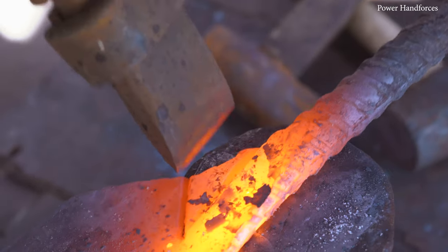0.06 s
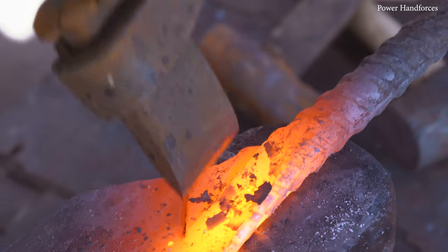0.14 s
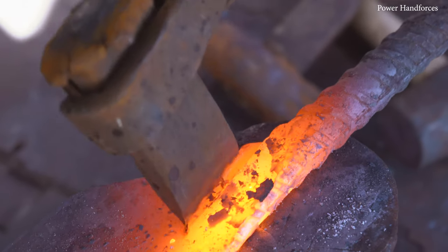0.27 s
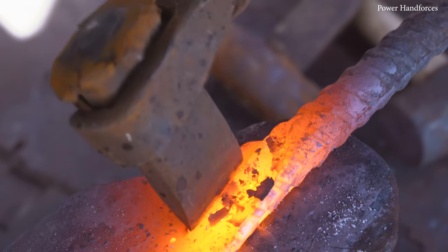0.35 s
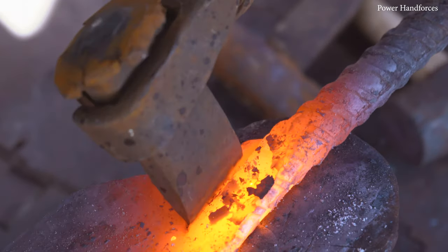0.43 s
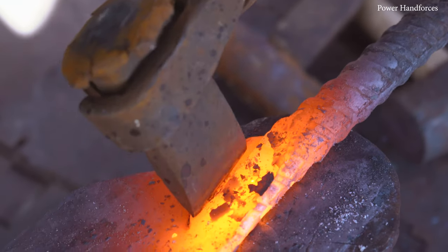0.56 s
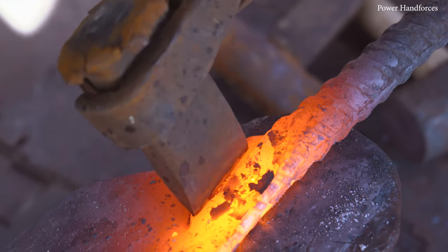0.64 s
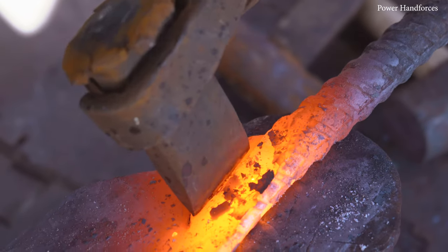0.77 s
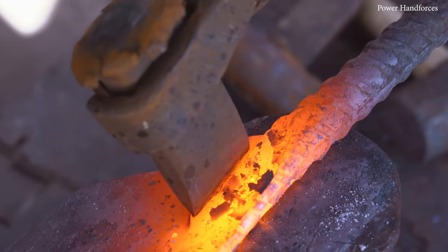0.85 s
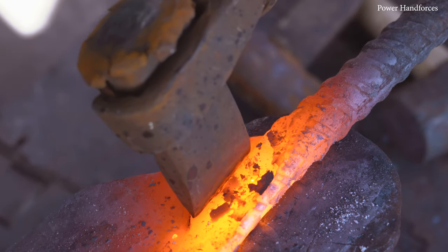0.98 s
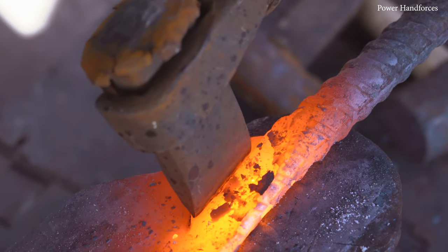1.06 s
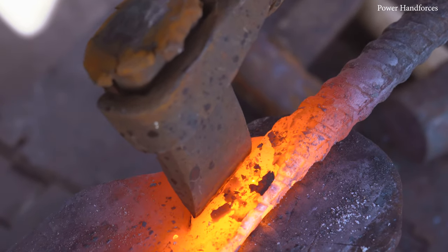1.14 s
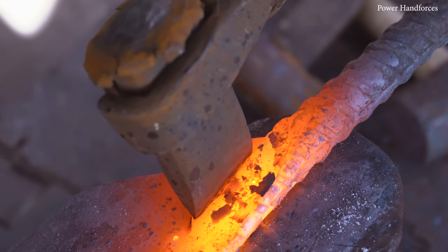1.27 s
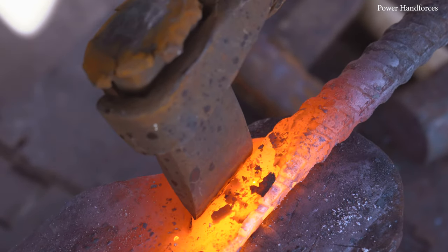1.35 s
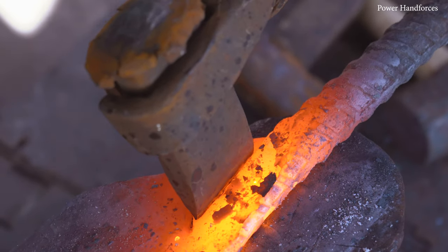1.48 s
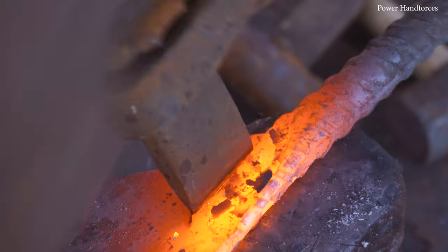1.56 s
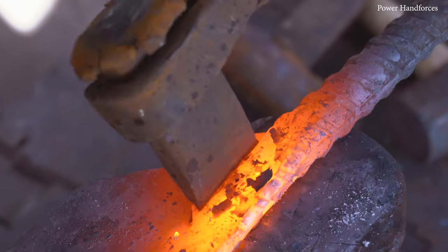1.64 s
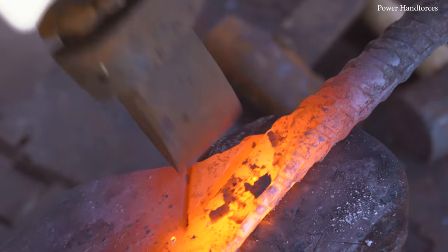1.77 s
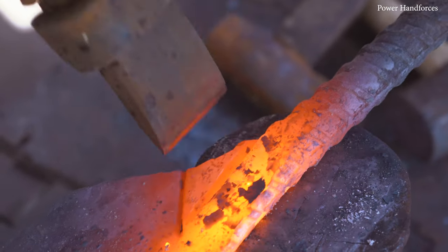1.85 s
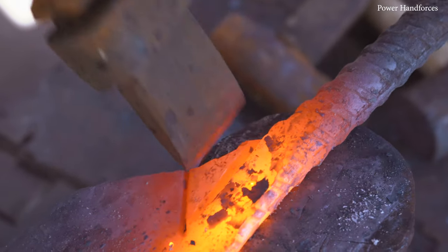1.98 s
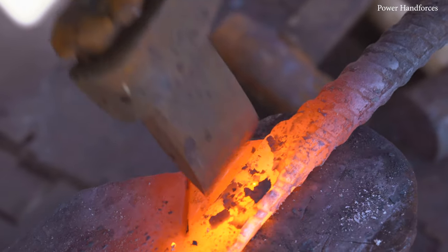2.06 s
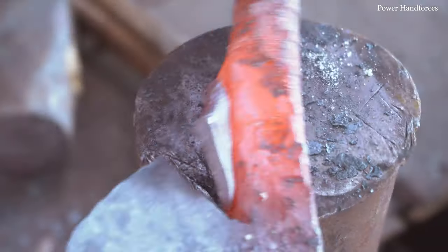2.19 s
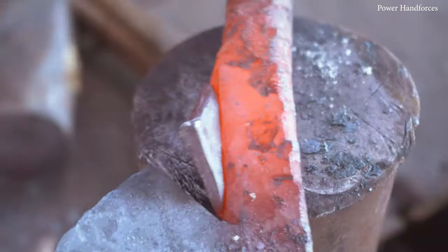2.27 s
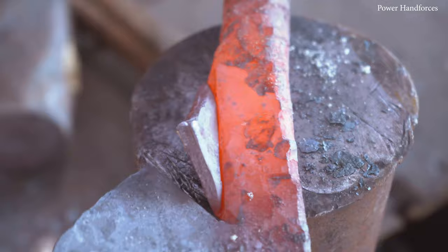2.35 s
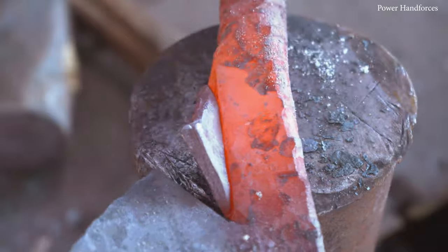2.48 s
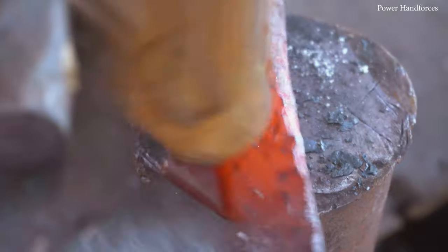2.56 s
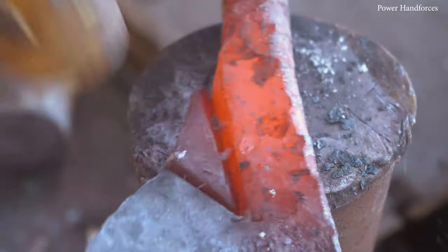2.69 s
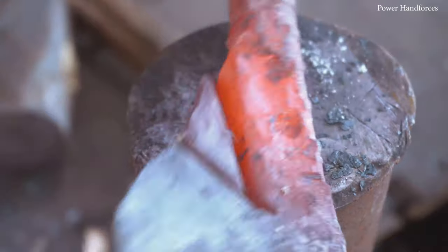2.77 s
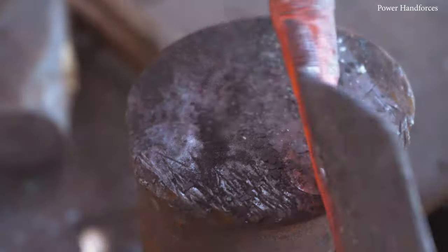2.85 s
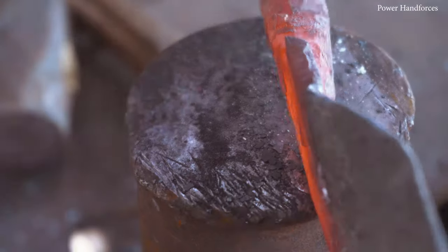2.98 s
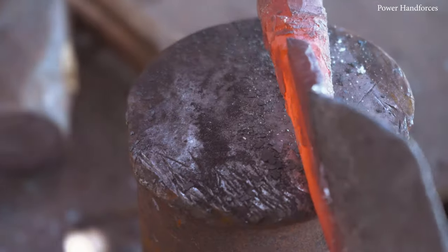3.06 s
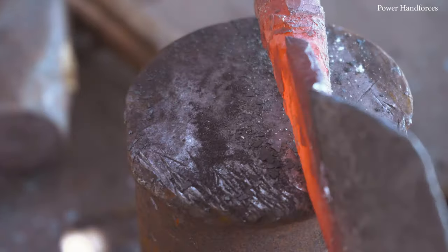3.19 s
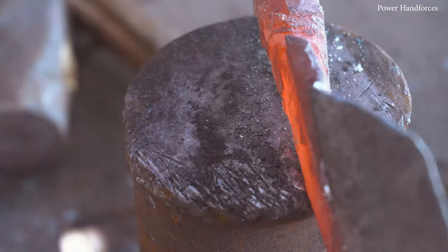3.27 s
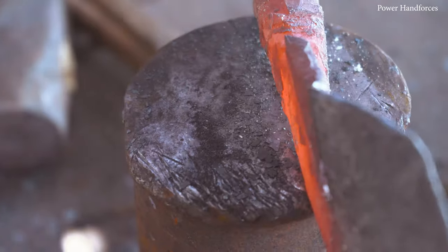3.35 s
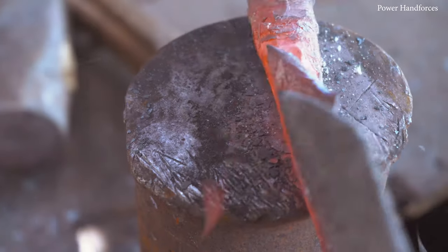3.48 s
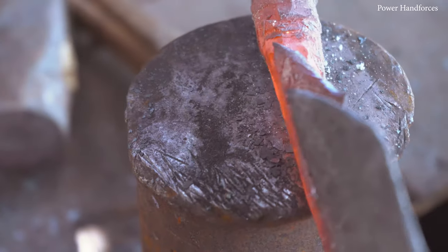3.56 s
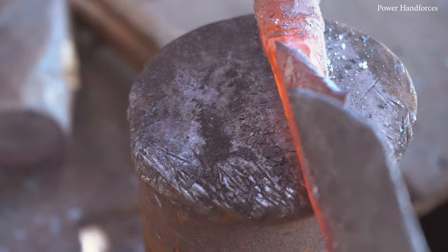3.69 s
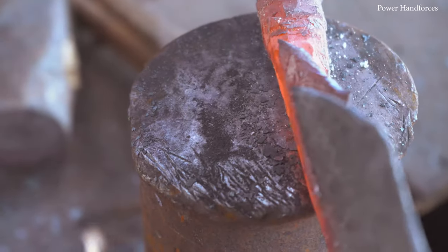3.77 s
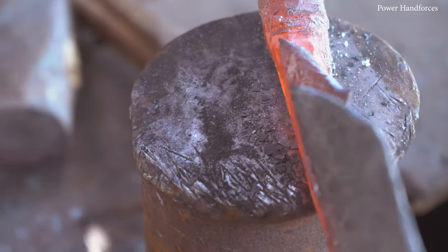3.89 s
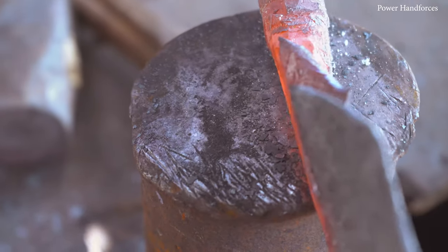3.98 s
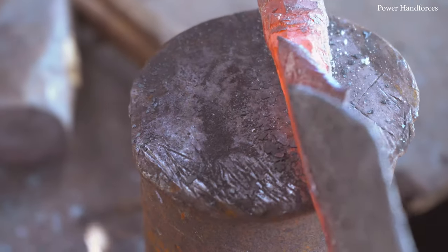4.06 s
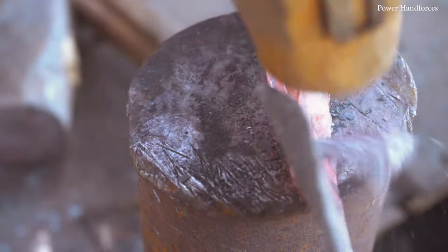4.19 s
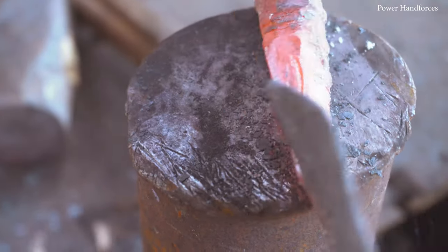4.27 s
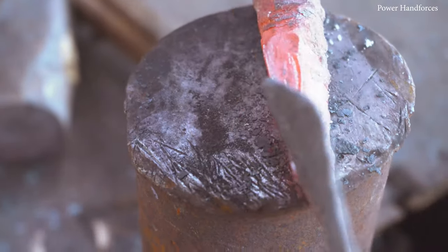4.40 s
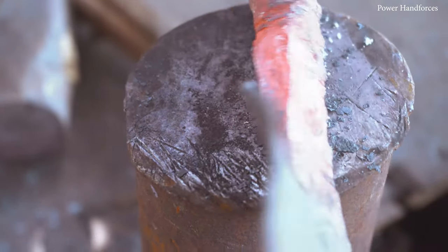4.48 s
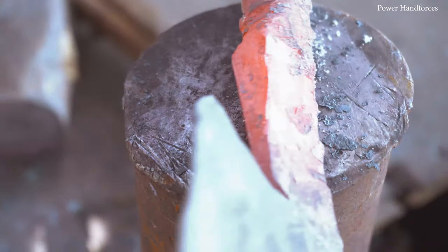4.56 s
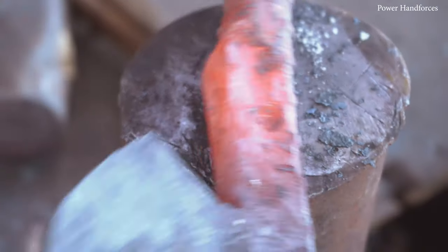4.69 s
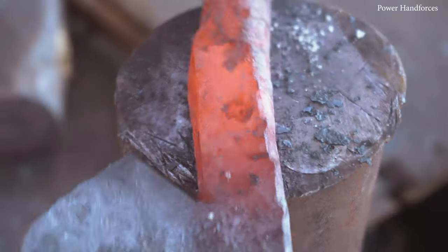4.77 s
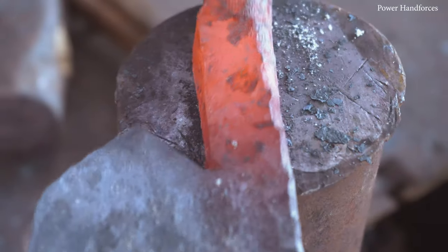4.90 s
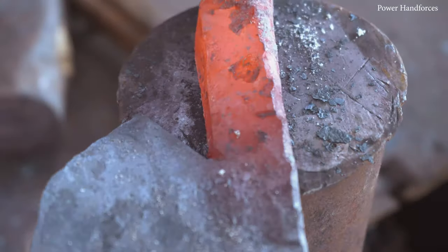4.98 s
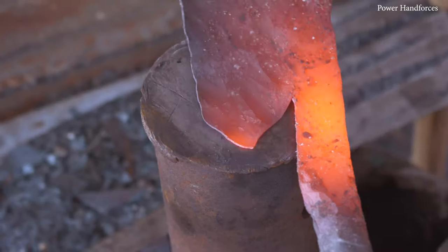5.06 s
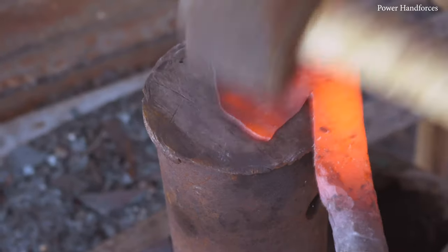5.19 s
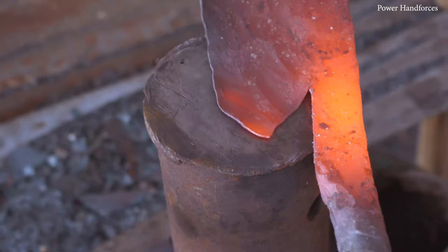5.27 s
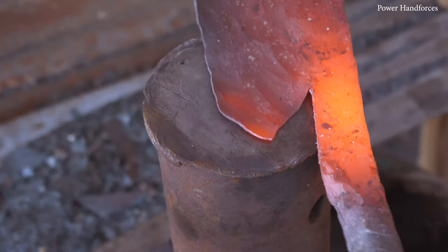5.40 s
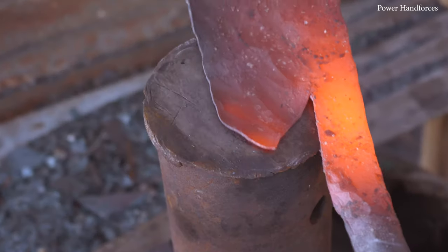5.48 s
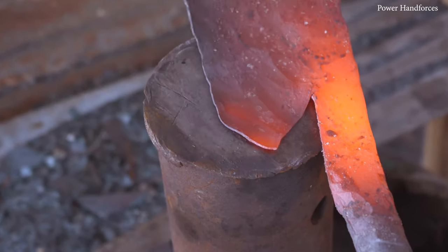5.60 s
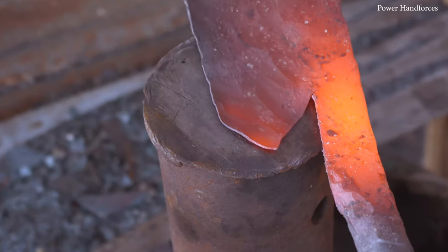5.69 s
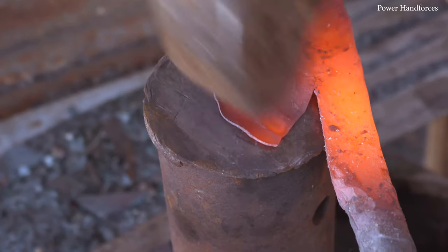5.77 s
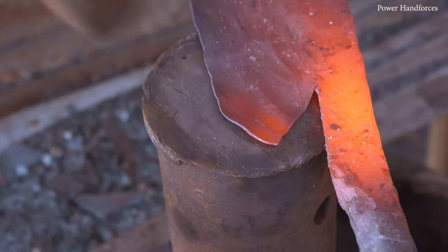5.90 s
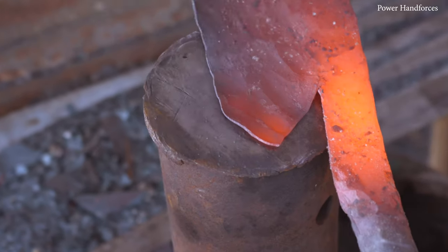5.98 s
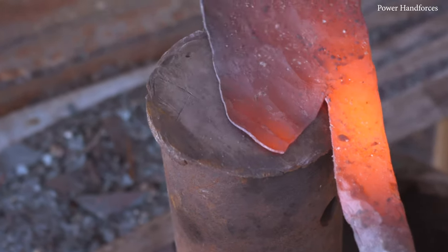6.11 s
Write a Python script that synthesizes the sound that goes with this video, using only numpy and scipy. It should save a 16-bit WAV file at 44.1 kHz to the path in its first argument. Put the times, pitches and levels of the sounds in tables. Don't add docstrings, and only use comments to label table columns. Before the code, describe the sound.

In an open metal workshop, sharp hammer cracks on glowing steel ring and echo, with light taps, ticking scale and machine drone.

```python
import sys
import numpy as np
from scipy import signal
from scipy.fft import rfft, irfft, next_fast_len
from scipy.io import wavfile
from scipy.ndimage import uniform_filter1d, map_coordinates

SR = 44100
rng = np.random.default_rng(int(sys.argv[2]) if len(sys.argv) > 2 else 0)


def elevation(decibels):
    levels = np.asarray(decibels, float)
    return 10 ** (levels / 20)


def master(y):
    cut = np.clip(np.atleast_2d(y).T, -1, 1)
    pcm = np.round(cut * 32767)
    wavfile.write(sys.argv[1], SR, pcm.astype(np.int16))


N = 270774

# (start [s], end [s])
VIEWS = [
    (0, 2.212),
    (2.214, 5.1),
    (5.11, 6.14),
]


def unit(x):
    return x / np.sqrt(np.mean(x ** 2) + 1e-20)


def along(points, hz):
    f, v = np.transpose(points)
    return np.interp(np.log(hz + 1), np.log(f + 1), v)


def curves(rows):
    s, *cols = np.transpose(rows)
    return [np.interp(np.arange(N) / SR, s, c) for c in cols]


def wobble(rate):
    knots = rng.standard_normal(int(N * rate / SR) + 4)
    return map_coordinates(knots, [np.arange(N) * rate / SR])


def filtered(x, response):
    m = next_fast_len(x.shape[-1] + 8192)
    spectrum = rfft(x, m) * response(np.fft.rfftfreq(m, 1 / SR))
    return irfft(spectrum, m)[..., :x.shape[-1]]


def causal(x, gain):
    def response(hz):
        cepstrum = irfft(np.log(gain(hz) + 1e-4))
        cepstrum[..., 1:len(hz) - 1] *= 2
        cepstrum[..., len(hz):] = 0
        return np.exp(rfft(cepstrum))
    return filtered(x, response)


def high_pass(x, order, hz):
    return signal.sosfilt(signal.butter(order, hz, "high", fs=SR, output="sos"), x)


def rush(spectrum, size, patchy_db):
    z = signal.stft(rng.standard_normal((2, size + 512)), nperseg=512)[2]
    field = uniform_filter1d(uniform_filter1d(rng.standard_normal(z.shape[1:]), 6, 0), 8, 1)
    pair = signal.istft(z * elevation(patchy_db * unit(field)), nperseg=512)[1][:, :size]
    return unit(filtered(pair, lambda hz: elevation(along(spectrum, hz))))


def add(track, s, sound):
    at = round(s * SR)
    track[:, at:at + sound.shape[1]] += sound[:, :N - at]


def yard(beat):
    # (time [s], level [dB])
    busyness = [
        [(0, -61.5), (.1, -61.5), (.25, -65.5), (.55, -71), (.76, -65), (1.6, -59.5), (1.98, -57.5),
         (2.21, -64.5)],
        [(2.21, -53), (2.9, -51), (3.18, -49), (3.55, -44.5), (4.25, -48), (5.1, -49.5)],
        [(5.11, -54.5), (5.31, -62), (5.7, -57.5), (5.92, -62)],
    ]
    # (roar [dB], drone [dB], hiss [dB])
    layer_levels = [
        (-1, 1.5, 0),
        (-3, 2, 0.25),
        (-1.5, 2, -2),
    ]
    # (frequency [Hz], density [dB per Hz])
    roar_spectrum = [(60, -23), (150, -39), (250, -8.5), (400, -6), (600, -3), (1000, -3.5), (1500, -7),
                     (2500, -11), (4000, -60)]
    drone_spectrum = [(500, -14.5), (1200, -4.5), (1800, 0), (3000, -2.5), (4500, -7), (8000, -25.5)]
    hiss_spectrum = [(2500, -21), (4500, 3), (6300, 3.5), (8300, 1), (10000, -7), (12500, -13.5),
                     (15700, -17), (16200, -36)]
    usual_db = [-64, -46.5, -59]
    roar_swing, hiss_swing = 0.51, 0.8
    view = np.searchsorted([VIEWS[0][1], VIEWS[1][1]], np.arange(N) / SR)
    calm_db = np.take(usual_db, view)
    swell_db = np.choose(view, [curves(rows)[0] for rows in busyness]) - calm_db
    roar_db, drone_db, hiss_db = calm_db + np.array(layer_levels)[view].T
    sway_db = .7 * wobble(7)
    roar_db = roar_db + roar_swing * swell_db + 0.6 * beat + sway_db
    drone_db = drone_db + swell_db + 0.5 * beat + sway_db
    hiss_db = hiss_db + hiss_swing * swell_db + 0.56 * wobble(11)
    roar = elevation(roar_db) * rush(roar_spectrum, N, patchy_db=1.0)
    drone = elevation(drone_db) * rush(drone_spectrum, N, patchy_db=1.2)
    hiss = elevation(hiss_db) * rush(hiss_spectrum, N, patchy_db=1.0)
    return roar + drone + hiss


def blower():
    # (time [s], frequency [Hz], level [dB])
    fan_tone = [(0, 236, -74), (.5, 252.5, -71.5), (1.0, 242.7, -74.5), (1.6, 229.5, -71),
                (2.2, 218.6, -73)]
    hz, db = curves(fan_tone)
    tone = np.sin(2 * np.pi * np.cumsum(hz + 9 * wobble(31.4)) / SR)
    running = np.arange(N) / SR < VIEWS[0][1]
    return running * elevation(db + 2.5 + 2.2 * wobble(10)) * tone


def engine():
    # (time [s], firing rate [Hz])
    firing_rate = [(2.21, 24.55), (2.62, 24.7), (2.85, 24.62), (3.2, 25.35), (3.45, 25.5), (3.79, 25.45),
                   (3.9, 25.26), (4.3, 25.2), (5.1, 25.2)]
    # (multiple of the firing rate, level [dB])
    exhaust_harmonics = [(4, -18), (5, -8), (6, 1.5), (7, 1.5), (8, -15), (9, -17), (10, -9), (11, -2),
                         (12, -1), (13, 1), (14, 0), (15, -5), (16, -2), (17, -2), (18, -5), (19, -4),
                         (20, -1), (21, -5), (22, -5), (23, -7), (24, -4), (26, -8), (29, -8), (30, -7)]
    # (time [s], sixth multiple [dB], seventh [dB], middle notes [dB],
    # upper notes [dB])
    note_shifts = [(2.21, -8, -0.5, -1, -7), (2.9, -7, -0.5, -2, -1.5), (3.1, -2.5, 0, -1.5, 1.5),
                   (3.5, -3, 1, -2, 4.5), (3.72, 1.5, -9, -2, -3), (4.05, 1, -11, -3, -1),
                   (4.22, -6, -0.5, -6, -4), (4.45, -9, 0, -4.5, -8), (4.8, -2.5, -1, -2.5, -2),
                   (5.1, 1.5, -2, -4.5, -4)]
    hz, = curves(firing_rate)
    t = np.arange(N) / SR
    start, end = VIEWS[1]
    on = (t > start) & (t < end)
    db = -54.5 + 1.5 * (t - start)
    turn = 2 * np.pi * np.cumsum(hz) / SR
    drift_db = 2.5 * wobble(3)
    sixth_db, seventh_db, middle_db, upper_db = curves(note_shifts)
    total = np.zeros(N)
    for k, level_db in exhaust_harmonics:
        shift_db = (k == 6) * sixth_db + (k == 7) * seventh_db
        shift_db = shift_db + (9 < k < 16) * middle_db + (k > 15) * upper_db
        own_drift_db = np.roll(drift_db, int(9001 * k))
        phase = k * (turn - .35) + 0.94 * rng.normal()
        total += elevation(level_db + shift_db + own_drift_db) * np.sin(phase)
    note = np.zeros(N)
    note[on] = unit(total[on])
    return elevation(db) * note, on * np.cos(turn - 1.5)


def spits():
    # (time [s], peak level [dB], centre frequency [Hz], T60 [s], spread of pitch [0-1])
    flake_ticks = [(.7495, -45.5, 5300, 0.082, 0.17), (1.963, -44, 5600, 0.15, 0.7),
                   (2.888, -32.5, 3950, 0.033, 0.5), (3.2139, -39.5, 2510, 0.05, 0.6),
                   (3.214, -35, 6900, 0.04, 0.4), (3.218, -40, 8400, 0.093, 0.15),
                   (4.686, -35.5, 1530, 0.046, 0.1), (5.614, -43.5, 4500, 0.12, .5),
                   (5.6556, -39.5, 4000, 0.039, 0.25), (5.6565, -37, 6500, .04, 0.4)]
    # (time [s], peak level [dB], centre frequency [Hz])
    edge_squeaks = [(.855, -50, 6230), (1.084, -50, 6460), (1.19, -53.5, 6870), (1.489, -47.5, 6200),
                    (1.570, -49, 6100), (1.643, -43.5, 6260), (.415, -71, 7000), (2.056, -47.5, 6970),
                    (2.92, -34, 8100), (5.59, -45, 7100), (5.61, -47, 7100), (5.659, -36.5, 8100),
                    (5.675, -41.5, 7300)]
    # (time [s], peak level [dB], centre frequency [Hz], T60 [s])
    scrape_puffs = [(0, -50, 6700, 0.18), (0.065, -52, 7440, 0.15), (0.118, -42.5, 6740, 0.15),
                    (.234, -53, 8760, 0.085), (.849, -49.5, 1610, 0.4), (.969, -50.5, 1230, 0.25),
                    (1.912, -49, 12000, .12), (2.12, -51.5, 4540, .26), (3.799, -36.5, 9490, 0.08)]
    rows = [(*row, 0.00073) for row in flake_ticks]
    rows += [(*row, 0.1, 0.18, 0.0044) for row in edge_squeaks]
    rows += [(*row, 0.7, 0.0065) for row in scrape_puffs]
    out, t = np.zeros((2, N)), np.arange(SR // 4) / SR
    for s, db, centre_hz, t60, spread, rise in rows:
        noise = rng.standard_normal((2, len(t)))
        grain_gain = elevation(2.2 * rng.standard_normal(len(t) // 64 + 1))
        grains = noise * grain_gain.repeat(64)[:len(t)]

        def band(hz):
            detuning = (hz / centre_hz - centre_hz / (hz + 1)) / max(1.4 * spread, .05)
            return (1 + detuning ** 2) ** -.8

        envelope = elevation(db + 0.5 - 60 * t / t60) * (1 - np.exp(-t / max(rise, .0003)))
        add(out, s, envelope * unit(filtered(grains, band)))
    return out


def ringing(modes, t, blur_hz, clear=0.76):
    hz, db, t60 = np.transpose(modes)[:, :, None]
    knots = np.arange(0, t[-1] + 2 / blur_hz, 1 / blur_hz)
    chance = rng.standard_normal((4 * len(modes), len(knots)))
    a, b = np.array([np.interp(t, knots, row) for row in chance]).reshape(2, 2, len(modes), -1)
    direct = clear * np.array([1, .4])[:, None, None]
    grown = 1 - np.exp(-t / 0.0049)
    in_phase = (direct + .5 * a * grown) * np.sin(2 * np.pi * hz * t)
    quadrature = .5 * b * grown * np.cos(2 * np.pi * hz * t)
    return np.sum(elevation(db - 60 * t / t60) * (in_phase + quadrature), 1)


def taps():
    # (time [s], peak level [dB], clack level [dB])
    set_downs = [(.103, -52, -25), (0.123, -45, -21), (.165, -50, -20), (0.5149, -31, -13),
                 (0.6079, -28.5, -20), (.5255, -33, -16), (.6112, -29.5, -21)]
    # (frequency [Hz], level [dB], T60 [s])
    contact_modes = [
        [(1780, 3, .1), (2330, 6, .08)],
        [(540.5, -3.5, .3), (1760, 7.5, 0.134), (2340, 4, 0.19)],
        [(1770, 5.5, .1), (2330, 3, .08)],
        [(360, -3, 0.098), (514, -6, 0.2), (793, -0.5, 0.12), (1070, -11, 0.15), (1631, 1, 0.2),
         (1774, 7, 0.065), (2020, 5, 0.09), (2261, -3, 0.13), (2374, -1, .08), (2850, -16, .24),
         (3140, -8, .06)],
        [(536, -8.5, 0.11), (910, -11, .04), (1150, -22, .09), (1656, -1, 0.08), (1940, 10, 0.054),
         (2030, 3, 0.1), (2200, 6, 0.062), (2360, 0, .07), (2430, -5, 0.072), (2800, -11, .08)],
        [(1700, 4, .07), (2035, 4, .06), (2360, 3, .06)],
        [(1620, -2, .05), (2100, 5, .04), (2420, 3, .05)],
    ]
    # (frequency [Hz], density [dB per Hz])
    clack_spectrum = [(200, -13), (500, -3), (2000, -1), (3500, -9.5), (6000, -7), (12000, -26),
                      (16000, -33)]
    out, t = np.zeros((2, N)), np.arange(SR // 4) / SR
    for (s, db, clack_db), modes in zip(set_downs, contact_modes):
        decay = elevation(-60 * t / 0.043) + 0.5 * elevation(-60 * t / 0.316)
        clack = rush(clack_spectrum, len(t), patchy_db=2.0) * decay
        ring = ringing(modes, t, blur_hz=60.9)
        add(out, s, elevation(db - 12.0) * (ring + elevation(clack_db + 11.0) * clack))
    return out


def rebounds():
    # (time [s], level [dB])
    falls = [
        (1.718, -26.5),
        (4.5378, -20.5),
        (5.34, -29),
    ]
    # (frequency [Hz], level [dB], T60 [s])
    bar_modes = [
        [(533, -8, 0.39), (590, -2, 0.17), (630, 4.5, 0.16), (776, -5.5, .35), (900, -4, 0.2),
         (334, -7.5, 0.47)],
        [(567, -4, 0.14), (625, -2.5, 0.15), (756, 4, 0.12), (893, 0, 0.123), (1133, -2.5, 0.17),
         (1510, -18, .15)],
        [(330, -2.5, 0.42), (628, 2, 0.21), (1090, 0, 0.4)],
    ]
    out, t = np.zeros((2, N)), np.arange(int(.5 * SR)) / SR
    for (s, db), modes in zip(falls, bar_modes):
        add(out, s, elevation(db) * ringing(modes, t, blur_hz=39.98) * (1 - np.exp(-t / 0.0011)))
    return out


def anvil():
    # (time [s], level [dB], decay scale [ratio], side modes [dB])
    clear_notes = [
        (5.316, -21, 1.05, 3),
        (5.9024, -18, .85, -6),
    ]
    # (frequency [Hz], level [dB], T60 [s])
    cluster = [(5790, 0, .4), (5745, -7, .4), (5660, -5, .2), (5840, -9, .3)]
    out, t = np.zeros((2, N)), np.arange(int(.5 * SR)) / SR
    for s, db, scale, side_db in clear_notes:
        modes = [(hz, level_db + (k > 0) * side_db, t60 * scale)
                 for k, (hz, level_db, t60) in enumerate(cluster)]
        add(out, s, elevation(db) * ringing(modes, t, blur_hz=45.4, clear=1.3))
    return out


def push(hz, t, t60):
    rise = 1 - np.exp(-t / 0.00014)
    travel = np.sin(2 * np.pi * hz * t) * elevation(-60 * t / t60) * rise
    velocity = np.diff(travel, prepend=0) * SR / (2 * np.pi * hz)
    return velocity * [[1], [.3]]


def chatter():
    # (time [s], level [dB], frequency [Hz], T60 [s])
    landings = [(1.6716, -2, 2400, 0.0063), (1.6738, -5, 4000, .009), (1.6752, -7, 5800, .009),
                (1.674, 1, 5500, 0.0098), (1.6729, -1, 3420, .006), (2.7014, 2.5, 5330, 0.0064),
                (2.702, -4.5, 2170, 0.0085), (2.705, -0.5, 4600, .008), (2.706, -4, 3170, 0.015),
                (2.7061, -10, 955, .008), (2.7645, -11, 2250, 0.012), (2.7655, -15, 4000, .012),
                (3.5316, -6, 3500, 0.0044), (3.534, -2.5, 1900, 0.0062), (3.544, -1, 6860, .006),
                (4.2581, -7.5, 5360, .008), (4.259, -4.5, 7800, .008), (4.524, -9.5, 2500, .009),
                (4.5236, -6.5, 4770, 0.013), (4.5236, -14, 1090, .012), (5.3156, 2, 5700, 0.023),
                (5.3159, -3.5, 970, 0.02), (5.3167, 0, 2590, 0.014), (5.3230, 0.5, 4500, 0.014),
                (5.3235, -1, 5900, .012), (5.9012, 1, 6500, .007), (5.9011, 2, 1450, 0.009),
                (5.9015, -3.5, 3060, 0.014), (5.9027, 4, 2100, 0.008)]
    out, t = np.zeros((2, N)), np.arange(1000) / SR
    for s, db, hz, t60 in landings:
        add(out, s, elevation(db) * push(hz, t, t60))
    return out


def dying(pair, scale):
    # (frequency [Hz], T60 [s])
    shed_decay = [(200, 0.43), (1000, 0.38), (5000, 0.32), (14000, 0.25)]
    # (frequency [Hz], time [s])
    wall_delay = [(200, 0.0048), (600, 0.011), (2000, 0.0068), (8000, 0.0032)]
    hz, t, z = signal.stft(pair, SR, nperseg=256)
    decay = elevation(-60 * t / (scale * along(shed_decay, hz)[:, None]))
    growth = 1 - np.exp(-t / along(wall_delay, hz)[:, None])
    return signal.istft(z * decay * growth, SR, nperseg=256)[1][:, :pair.shape[1]]


def seated(noise, bright_db, body_hz, body_db, low_hz):
    mode_width_hz, mode_depth_db, body_octaves = 35, 2.6, 0.27
    comb_db = mode_depth_db * rng.standard_normal(int(SR / 2 / mode_width_hz) + 2)

    def octaves(hz, base_hz):
        return np.log2((hz + 50) / base_hz)

    def response(hz):
        tilt_db = bright_db * octaves(hz, 2000)
        lift_db = body_db * np.exp(-(octaves(hz, body_hz) / body_octaves) ** 2)
        fine_db = np.interp(hz / mode_width_hz, np.arange(len(comb_db)), comb_db) * hz / (hz + 800)
        return elevation(tilt_db + lift_db + fine_db) / np.sqrt(1 + (low_hz / (hz + 1)) ** 8)

    return unit(filtered(noise, response))


def lumpy(noise):
    lumps_per_s, depth_db = 650, 1.67
    t = np.arange(noise.shape[1]) / SR
    knots = rng.standard_normal((2, int(t[-1] * lumps_per_s) + 2))
    lumps = np.array([np.interp(t * lumps_per_s, np.arange(len(row)), row) for row in knots])
    return unit(noise * elevation(depth_db * lumps))


def blows():
    # (time [s], crack [dB], clang [dB], ring [dB], crack frequency [Hz])
    strokes = [
        (1.6711, -4, -7.5, -21.5, 2270),
        (2.7016, -9, -11, -19.5, 4640),
        (2.7606, -24, -23.5, -24, 2270),
        (3.5315, -10.5, -12.5, -26.5, 2040),
        (4.2575, -10, -14.5, -22.5, 1846),
        (4.5224, -13, -13, -20.5, 3336),
        (5.3156, -5, -8, -19.5, 2200),
        (5.9011, -9, -6, -24.5, 1780),
    ]
    # (decay scale [ratio], brightness [dB per octave],
    # body frequency [Hz], body level [dB], low limit [Hz])
    bar_seats = [
        (1.146, -0.27, 6240, 5, 120),
        (1.02, 1.9, 3600, -1.5, 150),
        (0.68, 2.3, 900, 10, 210),
        (0.77, -0.47, 8000, 2, 290),
        (1.015, 0.6, 3900, -5, 173),
        (0.75, -3.5, 1130, -5, 740),
        (0.93, -0.54, 2505, 7, 197),
        (0.84, -0.36, 1870, 4, 206),
    ]
    view_of_blow = [0, 1, 1, 1, 1, 1, 2, 2]
    # (frequency [Hz], density [dB per Hz])
    clang_spectra = [
        [(59, -67), (100, -28), (260, -21), (640, -13), (1150, -17.5), (5400, -10.5), (9500, -15.5),
         (16300, -33)],
        [(59, -58), (100, -24.5), (420, -5), (1200, -8), (4670, -5), (6900, -1.5), (14800, -16.5), (16500, -47)],
        [(59, -61), (150, -13.5), (380, -16.5), (800, -6.5), (2500, -9.5), (3700, -11.5), (6200, -4),
         (16000, -29.5)],
    ]
    # (frequency [Hz], density [dB per Hz])
    crack_spectrum = [(120, -47), (200, -35), (1800, -7), (5870, -4.5), (8970, -29), (12300, -28),
                      (15000, -26), (16500, -58)]
    # (frequency [Hz], level [dB], T60 [s])
    cut_modes = [
        [(623, -5.5, 0.3), (1950, -4, 0.28), (4050, -2, 0.35), (5430, 3.5, 0.33), (5500, -3, 0.32),
         (5740, -10, .25), (6100, -9, 0.28), (7130, -7, .4), (7640, 4, 0.29), (7800, -2, .2), (8314, 3, 0.26),
         (8473, 1, 0.32), (10060, 2, 0.26), (10024, 0.5, 0.37)],
    ]
    trim_modes = [
        [(2340, 0, 0.064), (3120, -22, .1), (4530, -1, 0.069), (5200, 3, 0.12), (6200, -1, 0.14),
         (7900, -13, .2)],
        [(2260, 6.5, 0.086), (2595, 1.5, 0.11), (3241, 6.5, 0.081), (4005, 0, .08), (5884, 0, .06)],
        [(529, -7.5, 0.12), (670, -5, 0.145), (809, 2, 0.15), (400, -9, .2), (1600, -2, .08), (1900, 7, 0.104),
         (2240, 0, 0.23), (6700, -16.5, .17), (6800, -2, .12), (7600, 0, .07)],
        [(539.5, -4, 0.17), (1650, -21, 0.091), (5270, -8, 0.13), (5900, -10, .17), (6860, 3.5, 0.17),
         (7640, -5, 0.34), (8425, 0, .12), (9290, -1, .15), (10150, -1, 0.19)],
        [(776, -3, 0.1), (1106, -2, 0.14), (2104, 0, 0.19), (2840, -8, .15), (3190, 2, 0.18), (4400, 2, 0.1),
         (8600, -8.5, 0.39)],
    ]
    blade_modes = [
        [(532, -8.5, 0.44), (790, -6, 0.21), (2440, -0.5, 0.2), (2610, -1, 0.24), (4430, -13, 0.41),
         (4759, -6.5, 0.4), (5270, -1, 0.29), (6660, -2, 0.23), (10680, -14, 0.18), (11600, -7, 0.23),
         (13290, -5.5, 0.23)],
        [(560.5, -7, 0.58), (880, -3, 0.26), (1376, -6, 0.25), (1830, -7, 0.46), (1946, -6, 0.47),
         (3105, 6, 0.14), (10100, -9, 0.2), (6595, -11, .22), (7100, -1, 0.4)],
    ]
    out, t = np.zeros((2, N)), np.arange(int(.6 * SR)) / SR
    first = t[:SR // 20]
    all_modes = cut_modes + trim_modes + blade_modes
    for stroke, seat, view, modes in zip(strokes, bar_seats, view_of_blow, all_modes):
        s, crack_db, clang_db, ring_db, push_hz = stroke
        scale, *seating = seat
        spray = 0.91 * rush(crack_spectrum, len(first), patchy_db=1.5) * elevation(-60 * first / 0.022)
        add(out, s, elevation(crack_db) * (push(push_hz, first, 0.0071) + spray))
        noise = lumpy(seated(rush(clang_spectra[view], len(t), patchy_db=2.0), *seating))
        clang = dying(noise, scale) + elevation(-25) * dying(noise[:, ::-1], 2.48)
        add(out, s, elevation(clang_db) * clang)
        add(out, s, elevation(ring_db) * ringing(modes, t[:2 * SR // 5], blur_hz=69.8))
    return out


def scene():
    # (frequency [Hz], coherence [0-1])
    likeness = [(150, 0.999), (350, 0.95), (700, 0.85), (1300, 0.49), (2400, 0.17), (5000, 0.16),
                (15000, 0.19)]
    note, beat = engine()
    steel = high_pass(blows() + chatter() + anvil() + rebounds() + taps(), 3, 220)
    paths = steel + spits() + yard(beat) + (note + blower()) * [[1], [.2]]

    def rotation(hz):
        angle = np.arccos(np.clip(along(likeness, hz), -1, 1)) / 2
        return np.array([np.cos(angle), np.sin(angle)])

    mid, side = causal(paths, rotation)
    return np.array([mid + side, mid - side])


def follower(power, s):
    keep = np.exp(-1 / (s * SR))
    return signal.lfilter([1 - keep], [1, -keep], power)


def roll_off(x):
    return signal.sosfilt(signal.butter(12, 16860, fs=SR, output="sos"), x)


def record(dry):
    # (frequency [Hz], level difference [dB])
    port_tilt = [(300, 0), (1000, -1), (2400, -1.5), (4000, -0.5), (5500, -2.5), (8000, -11.5), (11000, -7),
                 (15000, -4)]
    # (frequency [Hz], density [dB per Hz])
    rumble_spectrum = [(15, -50), (25, -25), (54, -15.5), (140, -1), (188, -5), (200, 5.5), (260, -22),
                       (440, -120)]
    x = causal(dry, lambda hz: elevation(along(port_tilt, hz) * np.array([[.5], [-.5]])))
    power = np.mean(x ** 2, 0)
    level = np.sqrt(follower(power, 0.0046) + 1e-12)
    x = x * np.minimum(1, elevation(-17.0) / level)
    x = x / (1 + np.abs(x / .72) ** 4) ** (1 / 4)
    x = high_pass(x, 3, 85)
    side = high_pass(x[0] - x[1], 2, 250) / 2
    x = x.mean(0) + side * [[1], [-1]]
    shaking = elevation(-75.0) + elevation(-50.5) * np.sqrt(follower(power, 0.037))
    near, far = shaking * rush(rumble_spectrum, N, patchy_db=1.0)
    x = x + near + [[.04], [-.04]] * far
    x = causal(x, lambda hz: 1 / np.sqrt(1 + (hz / 15950) ** 120))
    return roll_off(x)


dry = scene()
out = record(dry)
master(out)
```